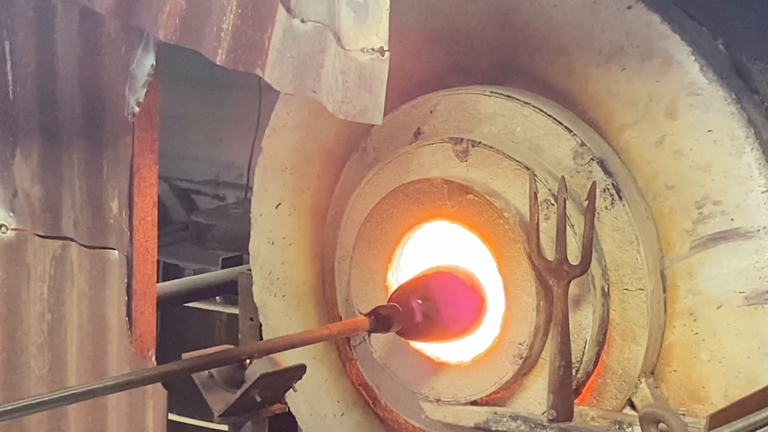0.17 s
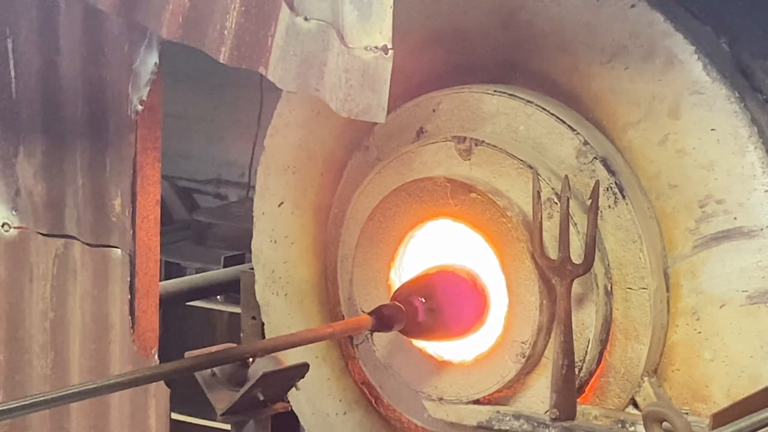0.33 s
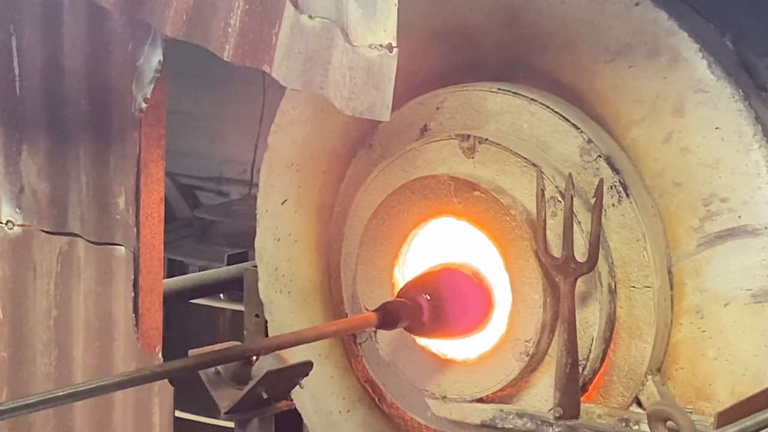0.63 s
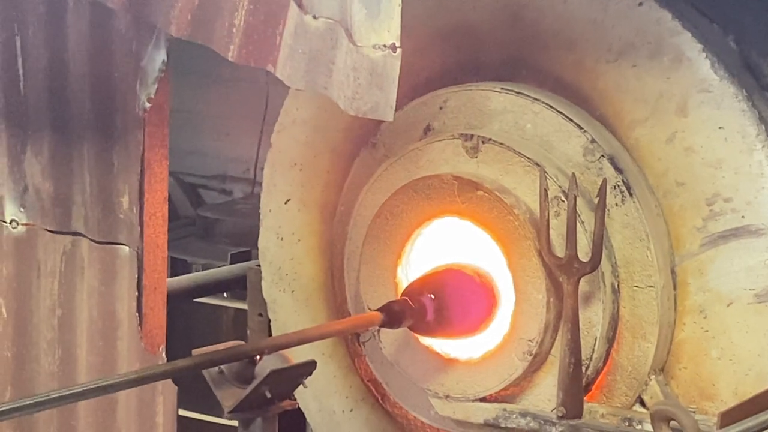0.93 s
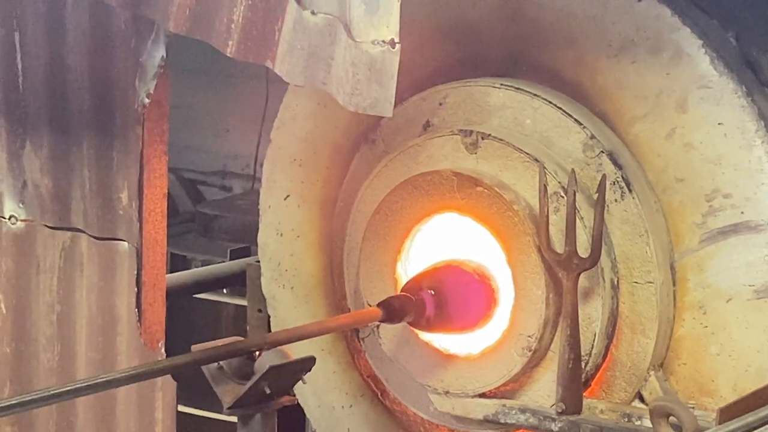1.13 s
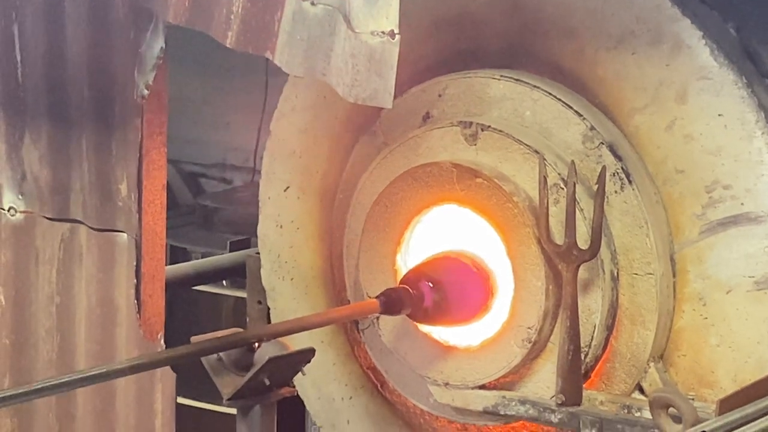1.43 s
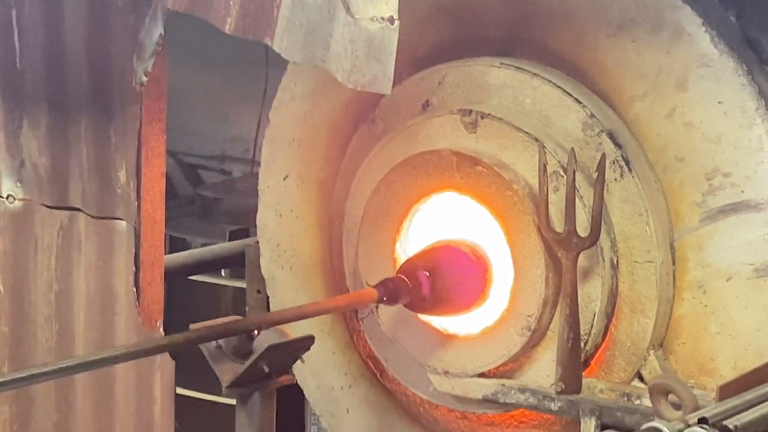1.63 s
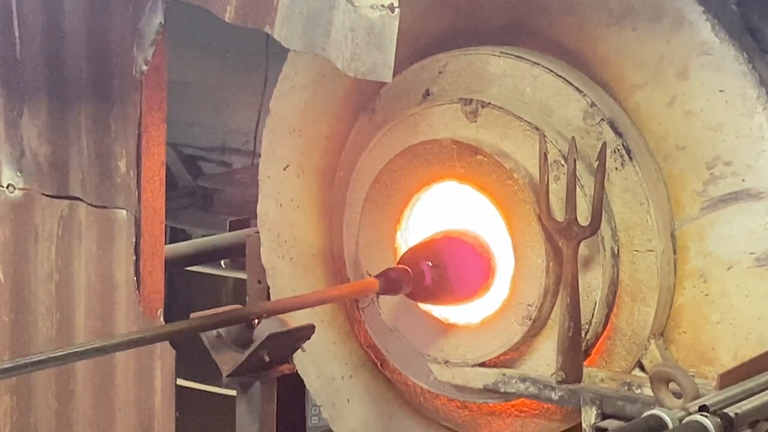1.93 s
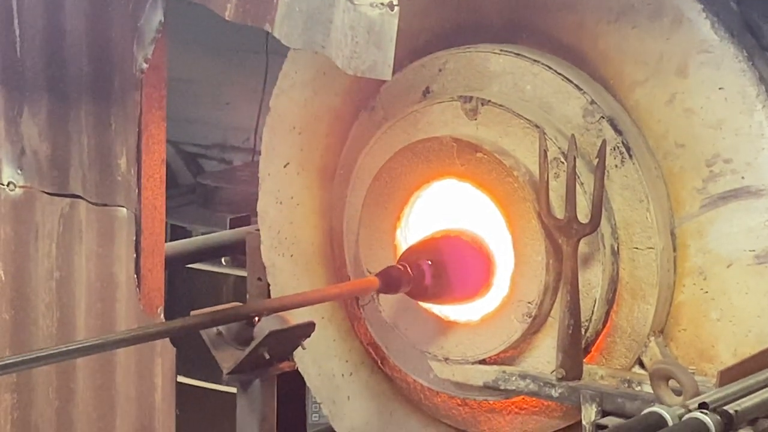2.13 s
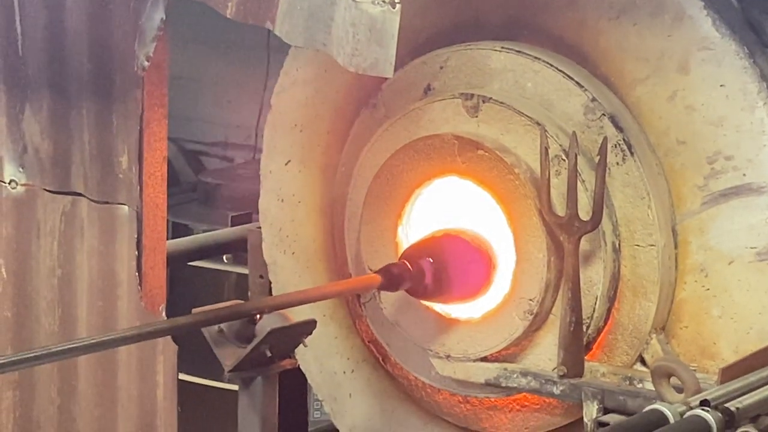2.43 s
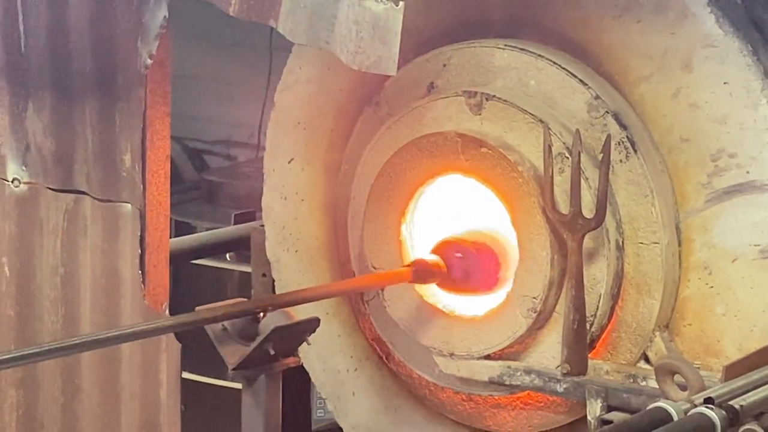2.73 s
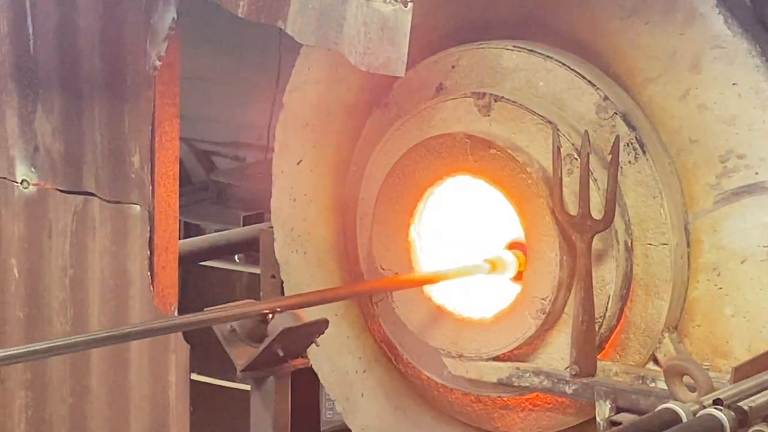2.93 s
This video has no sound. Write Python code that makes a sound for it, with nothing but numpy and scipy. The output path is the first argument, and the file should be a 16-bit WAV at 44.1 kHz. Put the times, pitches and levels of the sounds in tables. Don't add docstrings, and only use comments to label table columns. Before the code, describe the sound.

Glassblowing furnace roar, deep and unsteady, ending in a gritty ringing metal scrape on rollers

```python
import sys
import numpy as np
from scipy import signal
from scipy.fft import rfft, irfft, next_fast_len
from scipy.io import wavfile
from scipy.ndimage import uniform_filter1d, map_coordinates

SR = 44100
rng = np.random.default_rng(int(sys.argv[2]) if len(sys.argv) > 2 else 0)


def to_wav(sig):
    pcm = np.clip(np.atleast_2d(sig), -1, 1) * 32767
    pcm = np.round(pcm).astype(np.int16)
    wavfile.write(sys.argv[1], SR, pcm.T)


def invert_db(level):
    return 10 ** (np.asarray(level, dtype=float) / 20)


N = 136269


def unit(x):
    return x / np.sqrt(np.mean(x ** 2) + 1e-20)


def along(points, hz):
    point_hz, value = np.transpose(points)
    return np.interp(np.log(hz + 1), np.log(point_hz + 1), value)


def curve(rows):
    seconds, value = np.transpose(rows)
    return np.interp(np.arange(N) / SR, seconds, value)


def wobble(rate):
    knots = rng.standard_normal(int(N * rate / SR) + 4)
    return map_coordinates(knots, [np.arange(N) * rate / SR])


def filtered(x, response):
    m = next_fast_len(N + SR // 2)
    spectrum = rfft(x, m) * response(np.fft.rfftfreq(m, 1 / SR))
    return irfft(spectrum, m)[..., :N]


def colour(points):
    return lambda hz: invert_db(along(points, hz))


def resonances(rows):
    def response(f):
        total = 0
        for k, (centre, width, db) in enumerate(rows):
            damping = 1j * f * width
            total = total + (-1) ** k * invert_db(db) * damping / (centre * centre - f * f + damping + 1e-9)
        return total
    return response


def turbulence(response, patchy_db):
    z = signal.stft(rng.standard_normal(N), nperseg=512)[2]
    field = uniform_filter1d(rng.standard_normal(z.shape), size=6, axis=0)
    field = uniform_filter1d(field, size=12, axis=1)
    noise = signal.istft(z * invert_db(patchy_db * unit(field)), nperseg=512)[1][:N]
    return unit(filtered(noise, response))


def workshop():
    # frequency in Hz, level in dB per Hz.
    diffuse = [(24, -39), (40, -8), (145, 11), (319, 1.5), (357, 11.5), (392, -1), (1750, -7.5),
               (2450, -24.5), (3500, -21), (4550, -96), (7700, -120)]
    scattered = invert_db(-38.5) * turbulence(colour(diffuse), patchy_db=3.1)
    echo = invert_db(-9) * filtered(stand(), lambda hz: 1 / (1 + (hz / 2100) ** 8))
    return scattered + echo


def blower():
    # shaft order, level in dB rms.
    orders = [(1, -42.5), (2, -35), (5, -40.5), (6, -31.5)]
    shaft_hz, flutter_db = 59.44, .5
    turns = np.cumsum(shaft_hz * (1 + .0006 * wobble(3))) / SR
    out = np.zeros(N)
    for order, db in orders:
        tone = np.sqrt(2) * np.sin(2 * np.pi * (order * turns + rng.random()))
        out += invert_db(db + flutter_db * wobble(5.47)) * tone
    return out


def howl():
    # time in seconds, pitch in Hz.
    pitch = [(0, 128), (.2, 125), (.4, 105), (.8, 112), (.95, 121), (1.3, 113), (1.7, 118), (2.2, 117),
             (2.6, 114), (3.09, 116)]
    jitter_hz, flutter_db = 9, 3
    phase = 2 * np.pi * np.cumsum(curve(pitch) + jitter_hz * wobble(30)) / SR
    return unit(invert_db(flutter_db * wobble(24.97)) * np.sin(phase))


def burner():
    # time in seconds, strength in dB.
    flame = [(0, -22), (.25, -26), (.38, -20.5), (.65, -23), (.9, -22), (1.2, -23), (1.4, -19), (1.62, -26),
             (1.76, -20.5), (1.88, -25), (2.18, -20), (2.3, -19.5), (2.45, -25.5), (2.58, -17), (2.74, -26),
             (2.82, -29), (2.92, -22.5), (3.09, -18.5)]
    # frequency in Hz, level in dB per Hz.
    boom_colour = [(20, -60), (40, -27), (56, -11), (72, -1.5), (93, -3), (125, -4), (200, -14),
                   (500, -120)]
    # frequency in Hz, width in Hz, level in dB.
    drum_modes = [(89, 20.6, -13.5), (103.5, 14.3, -0.5), (123.6, 17.8, 4.5), (152.5, 17, -11.5)]
    # frequency in Hz, width in Hz, level in dB.
    chamber = [(209.7, 28.6, -0.5), (277.4, 23.3, 3), (331.8, 47.2, 0.5), (440, 207, -7.5), (636.5, 32, -4),
               (709, 56.7, -6), (794, 121, -10.5), (1166, 121, -18), (1550, 41, -12), (1587, 76, -14.5),
               (2026, 300, -21.5), (3170, 674, -26)]
    # frequency in Hz, level in dB per Hz.
    jet_colour = [(250, 4), (950, 10.5), (2500, -0.5), (3500, 2), (3900, -3.5), (7500, -9.5), (11000, -20),
                  (15800, -30)]

    def drum_response(hz):
        rumble_limit = 1 + (60 / (hz + 1)) ** 4
        treble_limit = 1 + (hz / 250) ** 4
        return resonances(drum_modes)(hz) / rumble_limit / treble_limit

    flame_db = curve(flame)
    drum = turbulence(drum_response, patchy_db=2.0)
    broad = turbulence(colour(boom_colour), patchy_db=-1.0)
    boom = invert_db(flame_db) * unit(broad + drum + 0.52 * howl())
    stir_db = 0.018 * (flame_db - flame_db.mean())
    roar = invert_db(-31 + stir_db) * turbulence(resonances(chamber), patchy_db=.5)
    jet = invert_db(-45 + stir_db + .8 * wobble(41.1)) * turbulence(colour(jet_colour), patchy_db=1.5)
    return boom + roar + jet


def scuffs():
    # start in seconds, level in dB, centre in Hz, width in Hz, length in seconds.
    touches = [
        (.07, -64, 13000, 2500, .02),
        (.24, -60, 11200, 900, .025),
        (.425, -58, 14500, 1800, .035),
        (1.2, -63, 13500, 2000, .03),
        (1.27, -58, 5500, 1500, .05),
        (1.41, -57, 11000, 5000, .06),
        (1.63, -63, 11000, 900, .04),
        (1.695, -44, 5000, 2800, .045),
        (1.69, -58, 12500, 4000, .07),
        (1.915, -60, 14000, 2500, .02),
    ]
    rise_s = .008
    t, out = np.arange(N) / SR, np.zeros(N)
    for start, db, hz, width_hz, length in touches:
        since = np.clip(t - start, 0, None)
        shape = (1 - np.exp(-since / rise_s)) * np.exp(-(since / length) ** 2)
        hiss = filtered(rng.standard_normal(N), lambda f: np.exp(-((f - hz) / width_hz) ** 2))
        out += invert_db(db) * shape * unit(hiss)
    return out


def friction(*parts):
    out = np.zeros(N)
    for db, response in parts:
        grains = unit(rng.standard_normal(N) * invert_db(1.3 * wobble(300) + 1.24 * wobble(30.56)))
        out += invert_db(db) * unit(filtered(grains, response))
    contact = np.clip((np.arange(N) / SR - 2.58) / .05, 0, 1)
    return contact * out


def stand():
    # time in seconds, load in dB.
    load = [
        (2.6, -18),
        (2.7, -6),
        (2.8, -1.5),
        (2.86, 2.5),
        (2.9, 3),
        (3.0, 1),
        (3.05, -2.5),
        (3.09, -4.5),
    ]
    # frequency in Hz, level in dB per Hz.
    rumble = [(150, 4), (300, -5), (700, 1.5), (1100, 4), (1700, 0), (2200, -10.5), (3500, -30)]
    # frequency in Hz, width in Hz, level in dB.
    roller_modes = [(647.5, 22, -6), (748, 28, -4.5), (809, 18, -4), (1008, 22, -6.5), (1091, 15, 4.5),
                    (1113, 20, -1.5), (1350, 27, -16), (1593, 70, -12), (1657, 53, -3), (1730, 22, -24)]
    return invert_db(curve(load)) * friction((-31.5, colour(rumble)), (-33.5, resonances(roller_modes)))


def pipe():
    # time in seconds, pressure in dB.
    pressure = [
        (2.58, -23),
        (2.65, -10.5),
        (2.72, -2),
        (2.78, 3),
        (2.84, 4.5),
        (2.89, 6),
        (2.96, 3),
        (3.03, 1.5),
        (3.09, -2),
    ]
    # frequency in Hz, level in dB per Hz.
    grit = [(2000, -30), (2600, -3), (4000, -4), (7000, -11.5), (9000, -10), (11000, -3.5), (13000, -16),
            (15700, -2.5)]
    # frequency in Hz, width in Hz, level in dB.
    pipe_modes = [(2430, 36, -3), (2690, 110, 0), (3170, 93, -4), (4120, 100, -6), (4650, 41, -5),
                  (4820, 35, -5), (5140, 23, -7), (5320, 39, -6), (5980, 140, -5), (6490, 20, -8),
                  (6660, 44, -6), (6920, 58, -6), (7470, 130, -10), (7720, 26, -15)]
    return invert_db(curve(pressure)) * friction((-38.5, colour(grit)), (-42.5, resonances(pipe_modes)))


def scene():
    # frequency in Hz, left over right in dB.
    lean = [(60, -1.1), (300, -1.8), (1000, -.3), (3000, -0.5)]
    lag_from_hz, lag_s = 7000, .00024

    def half(hz):
        delay = np.exp(-2j * np.pi * lag_s * np.clip(hz - lag_from_hz, 0, None) / 2)
        return invert_db(along(lean, hz) / 2) * delay

    wide = workshop()
    front = blower() + burner() + scuffs() + stand() + pipe()
    left = filtered(front, half) + wide
    right = filtered(front, lambda hz: 1 / half(hz)) - wide
    return np.array([left, right])


def top_cut(x):
    return signal.sosfilt(signal.butter(12, 15910, fs=SR, output="sos"), x)


def record(dry):
    top_hz = 15760
    mix = filtered(dry, lambda hz: hz < top_hz)
    return top_cut(mix)


dry = scene()
out = record(dry)
to_wav(out)
```